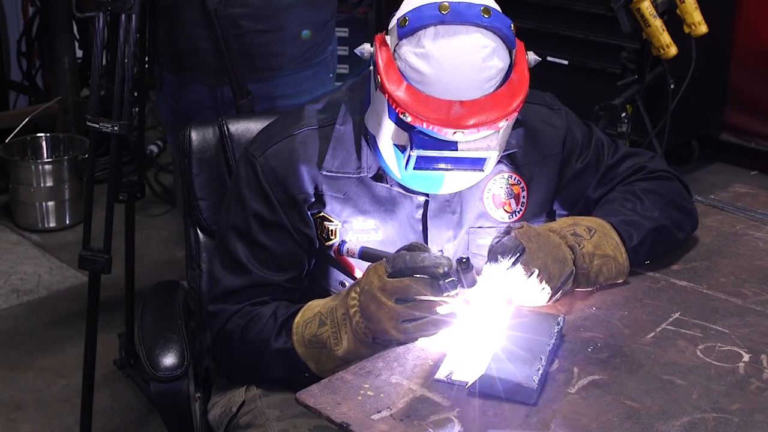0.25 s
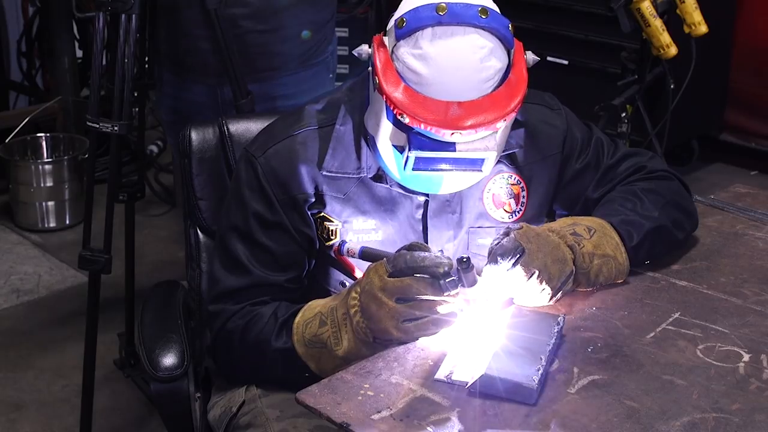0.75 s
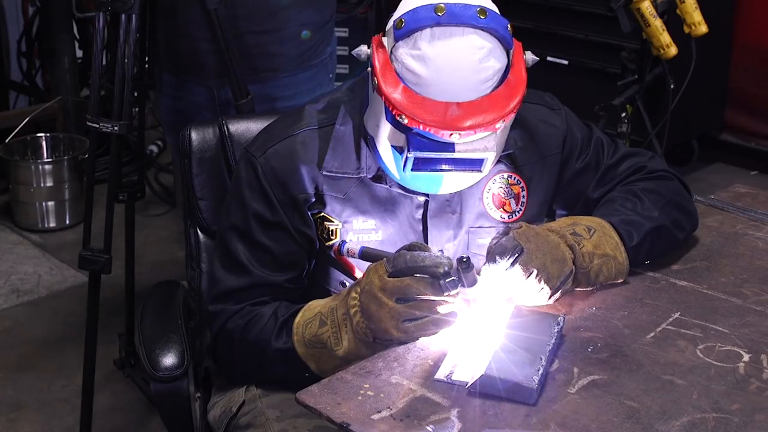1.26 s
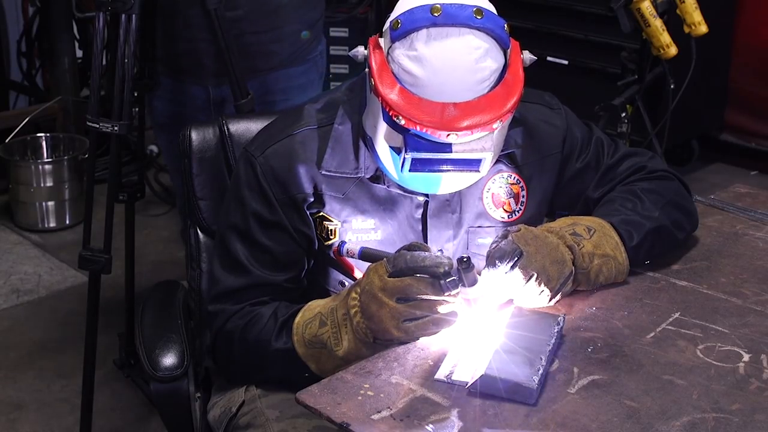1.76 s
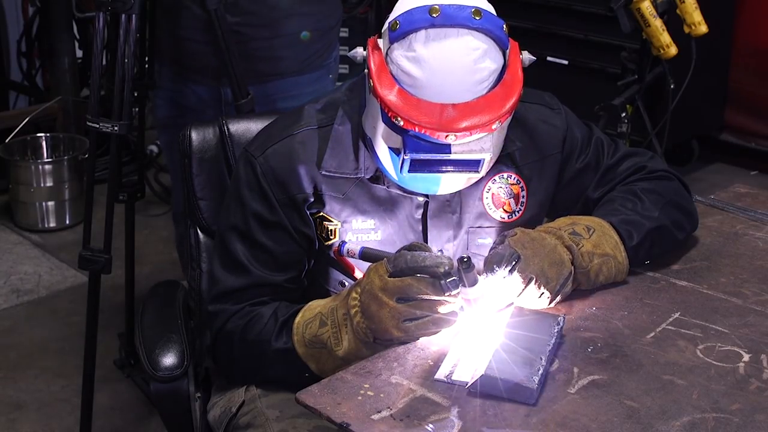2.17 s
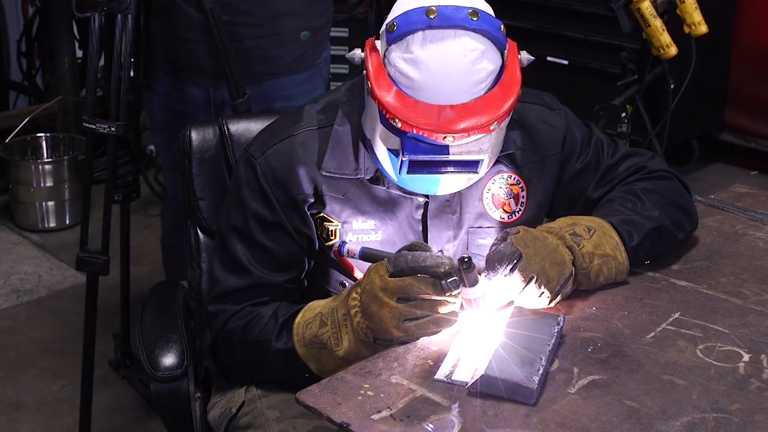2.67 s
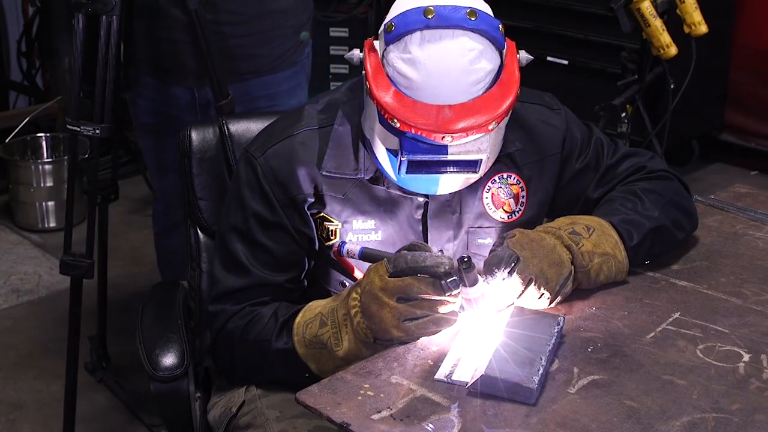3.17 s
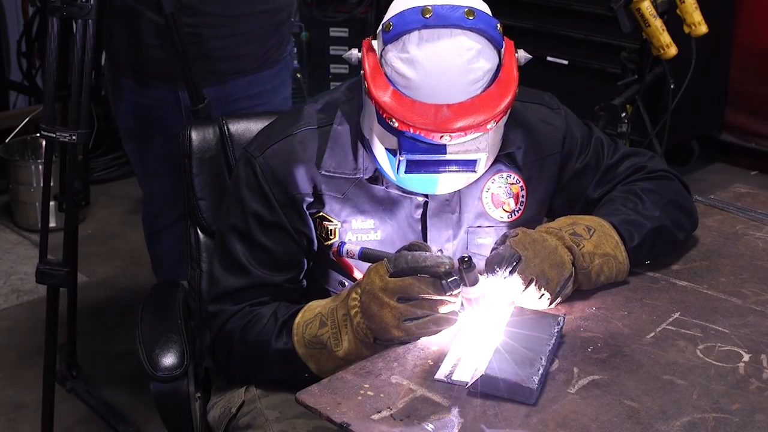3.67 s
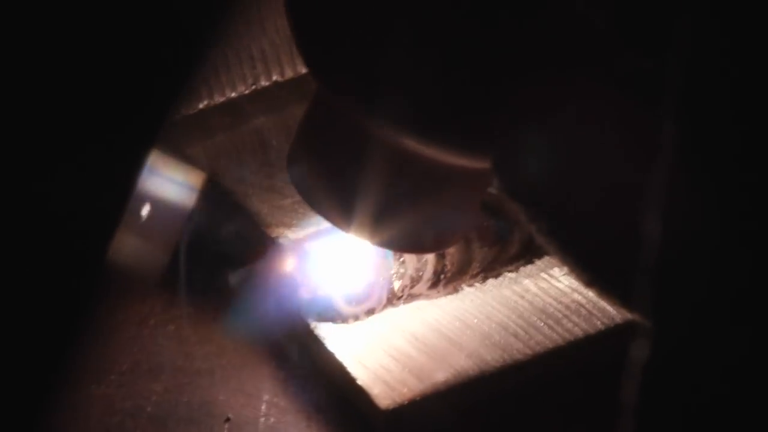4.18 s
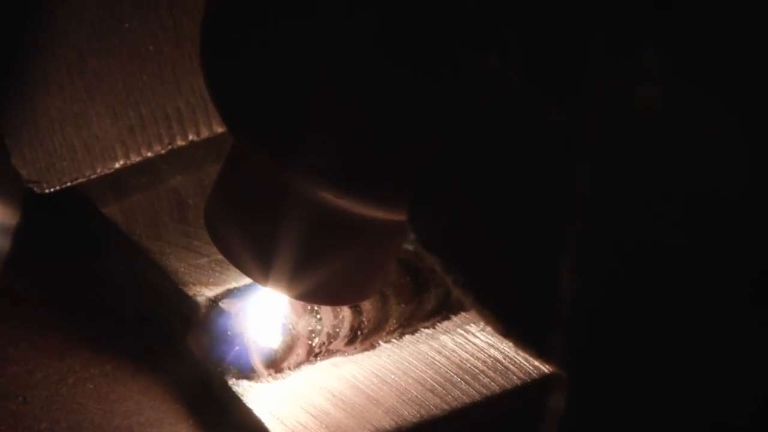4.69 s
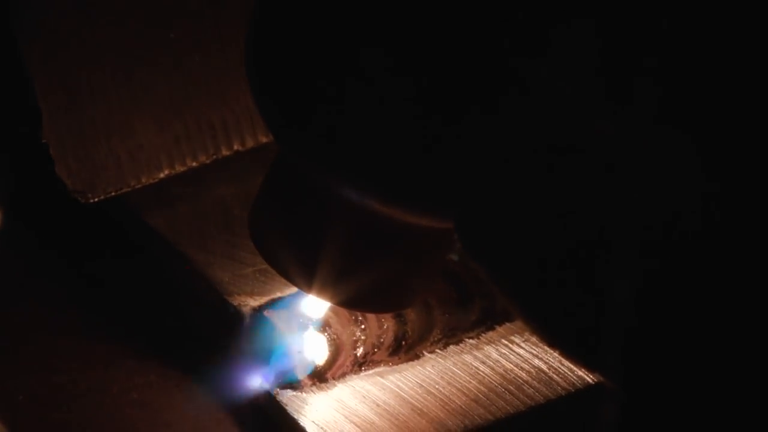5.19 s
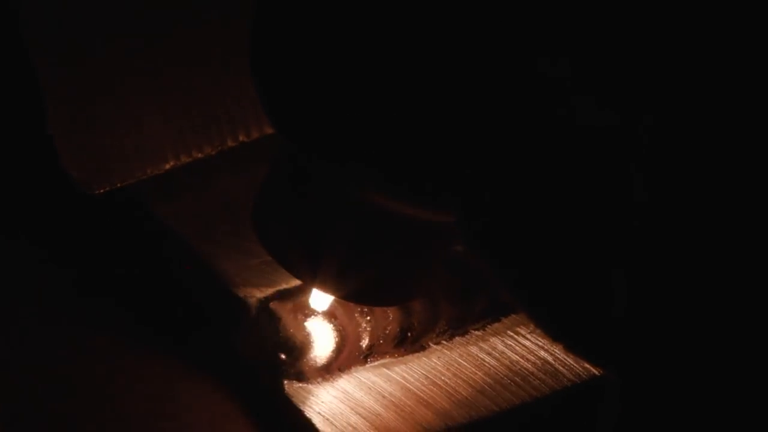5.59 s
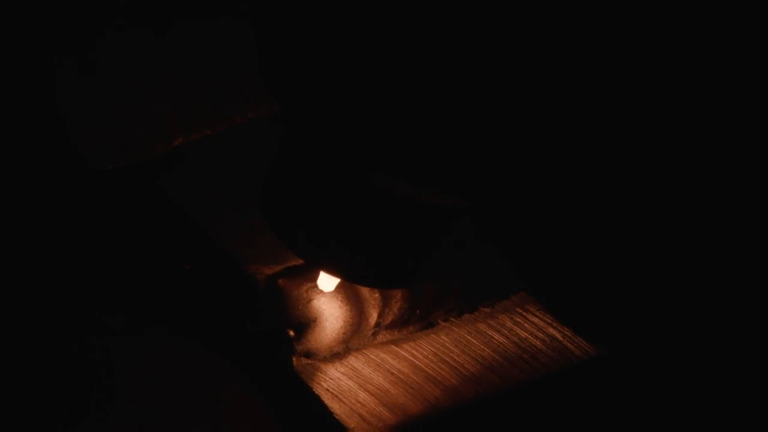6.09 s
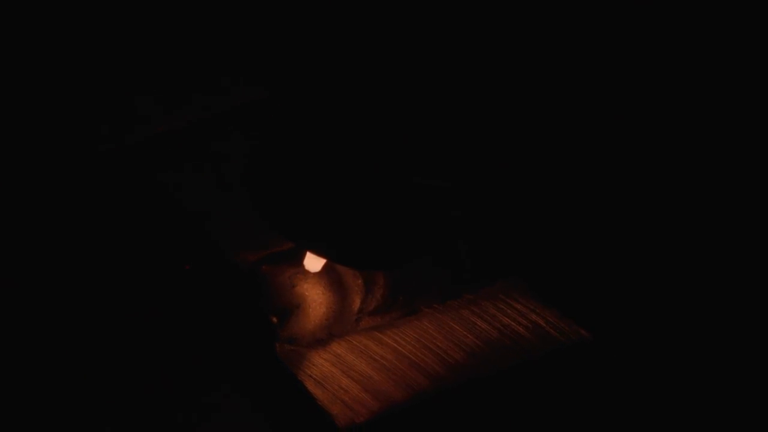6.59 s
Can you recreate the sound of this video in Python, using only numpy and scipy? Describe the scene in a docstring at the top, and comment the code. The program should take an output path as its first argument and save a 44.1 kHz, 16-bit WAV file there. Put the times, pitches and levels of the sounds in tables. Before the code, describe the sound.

From the start, a welding arc buzzes on metal close to the microphone, in a workshop with very little echo. The buzz holds one low pitch and is made of rapid, sharp electric snaps with a bright sizzle between them. It dips slightly about once a second and slowly weakens, with a few tiny spits between 1.4 and 4.7 seconds. The sizzle flares briefly around 2.5 and 5 seconds. From about 4 seconds the arc eases off, dropping clearly by 5.3 seconds. Around 5.7 seconds it comes back as a thin, hard, sputtering rasp, then cuts out at about 6.25 seconds. Behind it all along are a faint gas hiss, a quiet machine hum and a low rumble that swells gently about once a second. These carry on alone until the end, at about 7 seconds.

```python
"""A workshop, one microphone close to an AC TIG arc on aluminium. From the start the arc buzzes: the
current reverses twice a cycle, each time with a sharp snap of air, and between the two snaps the arc
sizzles on the oxide. The buzz ducks now and then and slowly weakens. From about 4 s the welder eases
off the current; the thin arc sputters, rasps and goes out at 6.25 s. Gas hiss, a machine hum and a
slowly swelling rumble, behind it all along, go on to the end."""
import sys
import numpy as np
from scipy import signal
from scipy.io import wavfile
from scipy.ndimage import uniform_filter1d

SR = 44100
rng = np.random.default_rng(int(sys.argv[2]) if len(sys.argv) > 2 else 0)


def to_wav(sig):
    """Store sig (one row per channel, or 1-D mono) as 16-bit WAV at the path in sys.argv[1].

    Samples outside -1..1 are clipped; the rate is SR.
    """
    pcm = np.clip(np.atleast_2d(sig), -1, 1) * 32767
    pcm = np.round(pcm).astype(np.int16)
    wavfile.write(sys.argv[1], SR, pcm.T)  # frames by channels


N = 302085

ARC_HZ, FIRST_STRIKE_S, ARC_OUT_S = 99.9967, .00654, 6.252
CLEANING_S = .00246  # from the strike (first reversal) to the return snap (second)

# snap spectra: (frequency [Hz], strike [dB], return snap [dB], either snap of the thin arc [dB])
SNAP_SPECTRA = [(102, -5, -29.5, -14), (393, -4.5, -9.5, -16.5), (633, -17, -13.5, -16.5),
                (1080, -11.5, -2.5, -5.5), (1533, -7.5, -3.65, -5.5), (2430, -19, -16.3, -6),
                (4030, -17, -16, -10.5), (6100, -16, -16.5, -19), (9840, -16.5, -24.5, -22),
                (13700, -16, -33.5, -19.5), (16100, -39.5, -24, -25)]
# peaks and notches of cup, gloves and plate around the full arc:
# (frequency [Hz], width [Hz], gain at the start of the joint [dB], gain further along [dB])
FULL_ARC_PEAKS = [(188, 120, 1.5, -3), (297, 210, -1, 1), (594, 150, 6, -4.5), (783, 123, 2.5, 2),
                  (1150, 550, -1, -4), (2250, 224, -6, -16.5), (3200, 636, 6.5, 10.5), (4140, 180, 2, -1),
                  (4680, 255, -4, -9.5), (5490, 300, -3, -8), (6050, 490, 4.5, -9), (6400, 480, -6.5, 0),
                  (7440, 1040, 9, 2), (8160, 1610, -11.5, -11.5), (9240, 400, -1, 9), (10100, 500, 4.5, -2),
                  (11160, 930, 11, 8), (12730, 1880, -10, -18.5), (15040, 550, 12, 13)]
# the same around the thin arc: (frequency [Hz], width [Hz], gain [dB])
THIN_ARC_PEAKS = [(1000, 100, -1), (1430, 570, 5), (2240, 640, -10), (3150, 320, -27), (3730, 680, 8.5),
                  (4390, 160, -12), (4940, 330, 4), (5920, 720, -9), (8200, 570, 7), (10800, 300, -8),
                  (12800, 530, -17)]
# the torch moves along the joint and the arc narrows: (time [s], travel [0-1], thinness [0-1])
TORCH_PATH = [(1.2, 0.23, 0), (2.8, 0.7, 0), (3.6, 1, 0.07), (4.7, 1, 0.07), (5.2, 0.6, 0.28),
              (5.6, 0.9, 0.93)]
# the buzz ducks, probably as filler rod is dabbed into the pool: (time [s], length [s], depth [dB])
ROD_DABS = [(-0.05, 0.5, 1.6), (0.95, 0.53, 2.3), (2.03, 0.5, 2.0), (2.71, 0.37, 3.1), (3.1, 0.56, 2.7),
            (4.04, 0.4, 2.6), (4.59, 0.23, 2.9)]
# the current eases off, then the starved arc strikes hard: (time [s], strike [dB], return snap [dB])
CURRENT_EASE = [(4.2, 0, 0), (5.0, -3.1, -0.3), (5.18, -4.5, -5.5), (5.33, -13.5, -12.5),
                (5.63, -12.3, -15), (5.71, -5, -12), (5.87, -0.2, -12)]
# single cycles that spit: (time [s], boost [dB])
ARC_SPITS = [(1.367, 2.5), (2.707, 2.5), (3.087, 4), (3.917, 4.5), (4.527, 7), (4.707, 7)]
# the thin arc nearly fails for a cycle or two: (time [s], length [s], gain [dB])
ARC_MISFIRES = [(5.672, 0.01, -2.5), (5.742, 0.02, -4.5), (5.772, 0.01, -3.5), (5.792, 0.02, -8),
                (5.842, 0.01, -3), (5.882, 0.01, -4), (5.942, 0.02, -6)]
# tone of the sizzle: (frequency [Hz], gain [dB])
SIZZLE_SPECTRUM = [(200, -5.5), (700, 8.5), (1400, 11), (2400, 13), (3200, 5), (6000, 11.5), (11000, 4),
                   (16000, 11)]
# the sizzle flares on patches of oxide: (peak time [s], half width [s], boost [dB])
OXIDE_FLARES = [(2.55, 0.12, 4), (4.96, 0.19, 6.5)]
# decay of the workshop: (frequency [Hz], time to fall 60 dB [s])
ROOM_DECAY = [(200, 0.15), (1500, 0.13), (5000, 0.2), (15000, 0.12)]
# workshop air and shielding gas: (frequency [Hz], relative level [dB])
AIR_SPECTRUM = [(25, -17), (70, -6), (150, -11.5), (260, -4.5), (400, -12.5), (550, -13.5), (1000, -13),
                (1800, -15), (2900, -27), (5000, -28), (9000, -38), (12000, -42), (16000, -56)]
# resonances of the gas in the cup: (frequency [Hz], width [Hz], gain [dB])
GAS_PEAKS = [(2000, 160, 5.5), (3880, 780, 8), (5000, 810, -9), (7800, 710, 13.5), (8700, 600, -9),
             (9600, 600, 9)]
# tones of the machine: (frequency [Hz], level [dB])
HUM_TONES = [(242, -68.5), (366, -71), (415, -66.5), (694, -71.5)]
# tone of the rumble: (frequency [Hz], relative level [dB])
RUMBLE_SPECTRUM = [(25, -34), (50, -7), (72, -1), (110, -3), (170, -12), (400, -32), (1500, -70)]
# swells of the rumble: (time [s], length [s], level [dB])
RUMBLE_SWELLS = [(-0.1, 0.55, -54.5), (1.05, 0.85, -56.5), (2.45, 0.55, -56.5), (3.6, 0.58, -53),
                 (5.02, 0.48, -55), (6.12, 0.68, -54.5)]


def arc(size=1024, jitter_db=0.4, unrest_db=1.8, flicker_db=3.0, treble_hz=4500, dip_hz=650):
    """Close up, each cycle: the current dips, the arc strikes, sizzles and snaps back with opposite sign."""
    times = np.arange(FIRST_STRIKE_S, ARC_OUT_S, 1 / ARC_HZ)[:, None]  # one row per cycle
    hz = np.fft.rfftfreq(size, 1 / SR)
    travel, thin = curve(TORCH_PATH, times, axis=1), curve(TORCH_PATH, times, axis=2)
    strike_db, back_db, treble_db, sizzle_db = arc_levels(times, thin)
    treble = hz ** 4 / (hz ** 4 + treble_hz ** 4)
    ripple_db = 3.5 * (1 - thin / 2) * hand_echoes((len(times), len(hz)))
    strike, back = snaps(hz, travel, thin, treble * (treble_db + ripple_db))
    # the snaps grow less even as the pool heats up
    uneven_db = jitter_db + unrest_db * (1 - thin) * times / ARC_OUT_S
    chance = rng.uniform(-1, 1, (len(times), 4)) * np.sqrt(3)
    strike_jitter, back_jitter, flicker, crispness = np.hsplit(chance, 4)
    strike_gain = amp(strike_db + uneven_db * (strike_jitter + treble * crispness))
    back_gain = amp(back_db + uneven_db * back_jitter)
    # the arc cools just before it reverses: a soft suck of air
    dip = amp(-11) * (1 - thin) * np.exp(-(hz / dip_hz) ** 2) * delay(hz, -.00031)
    sizzle = oxide_sizzle(hz, size, sizzle_db + flicker_db * flicker)
    cycles = strike_gain * (strike - dip) - back_gain * back * delay(hz, CLEANING_S) + sizzle * strike
    starts = (times * SR).astype(int) - size // 8
    waves = np.fft.irfft(cycles * delay(hz, times - starts / SR))
    buzz = np.bincount((starts + np.arange(size)).ravel(), waves.ravel(), N)
    return signal.sosfilt(signal.butter(1, 40, "high", fs=SR, output="sos"), buzz)


def arc_levels(times, thin, spit_body=0.5, treble_hold=0.42):
    """Gains in dB of strike, return snap, treble and sizzle, cycle by cycle."""
    duck = sum(db * envelope(times, at, length, attack=.03, release=.19) for at, length, db in ROD_DABS)
    ease = curve(CURRENT_EASE, times, axis=1)
    spits = sum(db * (abs(times - at) < .5 / ARC_HZ) for at, db in ARC_SPITS)
    misfires = sum(db * (times > at) * (times < at + length) for at, length, db in ARC_MISFIRES)
    flares = sum(db * np.exp(-((times - at) / width) ** 2) for at, width, db in OXIDE_FLARES)
    # both snaps and the sizzle weaken steadily
    strike = 4.8 - 0.74 * times - duck + ease + spit_body * spits + misfires
    back = 6.2 - 1.95 * times - 1.2 * duck + curve(CURRENT_EASE, times, axis=2)
    sizzle = -15.3 - 0.7 * times + ease + flares - 6.5 * thin
    # the treble ducks less than the body of the snaps, and the thin arc is brighter
    treble = -1.8 + treble_hold * (duck - ease) + 1.2 * thin + (1 - spit_body) * spits
    return strike, back, treble, sizzle


def snaps(hz, travel, thin, brightness_db, glide=0.069):
    """Spectra of strike and return snap, coloured by cup, gloves and plate on the way to the microphone."""
    full_db = (1 - travel) * bumps(FULL_ARC_PEAKS, hz) + travel * bumps(FULL_ARC_PEAKS, hz, axis=3)
    slide = 1 + glide * (1 - thin)  # the resonances around the thin arc slide down as it settles
    thin_db = spectrum(SNAP_SPECTRA, hz, axis=3) + bumps(THIN_ARC_PEAKS, hz / slide)
    shared_db = (1 - thin) * full_db + thin * thin_db + brightness_db
    strike = causal((1 - thin) * spectrum(SNAP_SPECTRA, hz, axis=1) + shared_db)
    back = causal((1 - thin) * spectrum(SNAP_SPECTRA, hz, axis=2) + shared_db)
    return strike, back


def oxide_sizzle(hz, size, gain_db):
    """Tiny bursts on the oxide fill the reversed part of the cycle; one spectrum per cycle."""
    shape = (len(gain_db), size)
    bursts = rng.standard_normal(shape) * amp(1.5 * np.minimum(rng.exponential(1, shape), 5))
    cleaning = np.arange(size) / SR < CLEANING_S
    bursts = evened(bursts * cleaning) / np.sqrt(size)
    return np.fft.rfft(bursts) * amp(gain_db + spectrum(SIZZLE_SPECTRUM, hz))


def hand_echoes(shape):
    """Echoes off the moving hands, as a random ripple that is smooth across cycles and frequency."""
    return evened(signal.convolve2d(drift(shape, size=45), np.hanning(15)[None], "same"))


def cup_scatter(x, bounce_s=.00022, leak=.3, above_hz=2600):
    """Short waves bounce between cup and plate, so the treble of each snap spreads over a millisecond."""
    hz = np.fft.rfftfreq(N, 1 / SR)
    direct = 1 - leak * hz ** 4 / (hz ** 4 + above_hz ** 4)
    echo = delay(hz, bounce_s)
    return np.fft.irfft(np.fft.rfft(x) * (direct + echo) / (1 + direct * echo), N)


def workshop(x, wet_db=-15.0):
    """At this short distance the room adds a faint tail of reflections, each band dying at its own speed."""
    taps = rng.choice([-1., 1.], SR // 2) * (rng.random(SR // 2) < .06)
    taps[:round(.004 * SR)] = 0  # no reflection in the first 4 ms
    hz, t, bands = signal.stft(taps, SR, nperseg=256)
    decay = amp(-60 * t / spectrum(ROOM_DECAY, hz)[:, None])
    tail = signal.istft(bands * decay, SR, nperseg=256)[1]
    return x + amp(wet_db) * signal.fftconvolve(x, tail / np.linalg.norm(tail))[:N]


def gas_hiss(hz, level_db=-55.5):
    """Shielding gas resonates in the cup, over the steady air of the workshop."""
    return amp(level_db) * noise(spectrum(AIR_SPECTRUM, hz) + bumps(GAS_PEAKS, hz))


def machine_hum(t, waver_rad=0.9):
    """A machine hums in the background, each tone wavering in phase."""
    return sum(amp(db) * np.sqrt(2) * np.sin(2 * np.pi * hz * t + waver_rad * drift(N, size=6000))
               for hz, db in HUM_TONES)


def rumble(t, hz, floor_db=-66):
    """Under everything, a low rumble swells about once a second."""
    swells = sum(amp(db) * envelope(t, at, length, attack=.1, release=.38)
                 for at, length, db in RUMBLE_SWELLS)
    return np.hypot(amp(floor_db), swells) * noise(spectrum(RUMBLE_SPECTRUM, hz))


def amp(db):
    return 10 ** (np.asarray(db) / 20)


def evened(x):
    return x / np.sqrt(np.mean(x ** 2) + 1e-20)


def delay(hz, seconds):
    return np.exp(-2j * np.pi * hz * seconds)


def envelope(t, start, length, attack, release):
    """Attack, hold and release, from 0 to 1; times in seconds."""
    return np.clip(np.minimum((t - start) / attack, (start + length - t) / release), 0, 1)


def curve(rows, t, axis=1):
    """One column of a table, joined by straight lines in time."""
    rows = np.array(rows)
    return np.interp(t, rows[:, 0], rows[:, axis])


def spectrum(rows, hz, axis=1):
    """One column of a table, joined by straight lines in log frequency."""
    rows = np.array(rows)
    return np.interp(np.log(hz + 1), np.log(rows[:, 0] + 1), rows[:, axis])


def bumps(rows, hz, axis=2):
    """Resonant peaks and notches, in dB."""
    return sum(row[axis] / (1 + (2 * (hz - row[0]) / row[1]) ** 2) for row in rows)


def drift(shape, size):
    """Smooth random wander of unit strength along the first axis."""
    return evened(uniform_filter1d(uniform_filter1d(rng.standard_normal(shape), size, 0), size, 0))


def causal(db):
    """Spectra of the most sudden (minimum-phase) pulses that have these gains."""
    cepstrum = np.fft.irfft(np.log(amp(db)))
    half = cepstrum.shape[-1] // 2
    cepstrum[..., 1:half] *= 2
    cepstrum[..., half + 1:] = 0
    return np.exp(np.fft.rfft(cepstrum))


def noise(db):
    """Noise of unit level, shaped by the given gain in each bin."""
    return evened(np.fft.irfft(np.fft.rfft(rng.standard_normal(N)) * amp(db), N))


def scene():
    """One channel: the arc in front, with hiss, hum and rumble behind it."""
    hz, t = np.fft.rfftfreq(N, 1 / SR), np.arange(N) / SR
    return (workshop(cup_scatter(arc())) + gas_hiss(hz) + machine_hum(t) + rumble(t, hz))[None]


def record(dry):
    """The recorder passes sound up to about 16 kHz."""
    low_pass = signal.firwin(511, 16100, window=("kaiser", 9), fs=SR)
    return signal.oaconvolve(dry, low_pass[None], "same")


dry = scene()
out = record(dry)
to_wav(out)
```